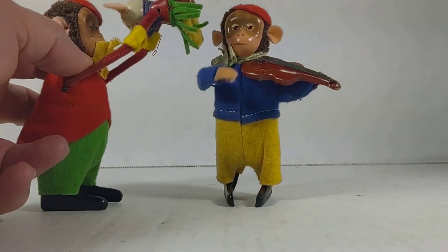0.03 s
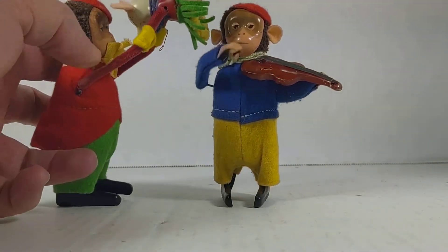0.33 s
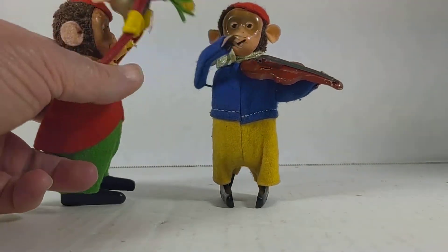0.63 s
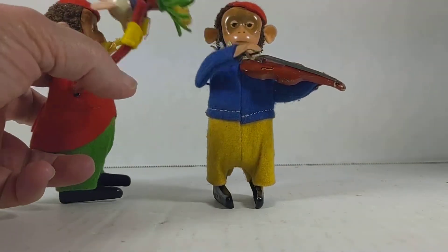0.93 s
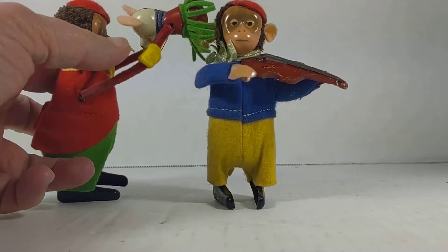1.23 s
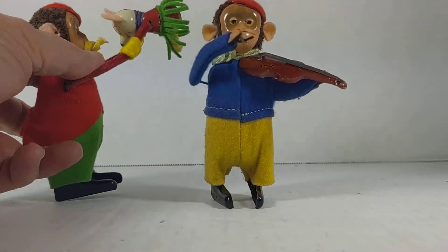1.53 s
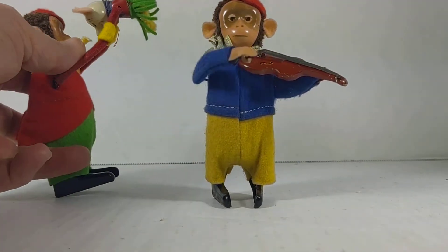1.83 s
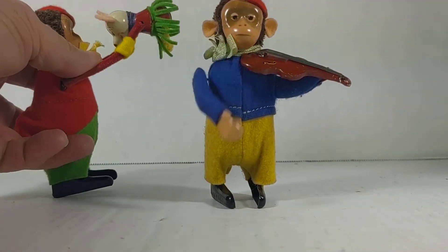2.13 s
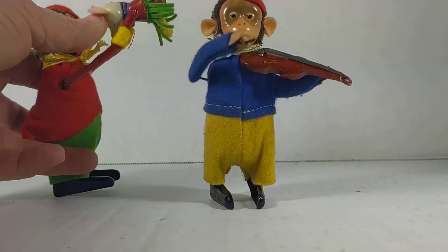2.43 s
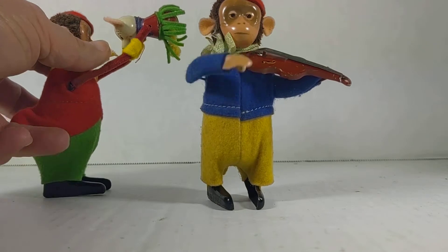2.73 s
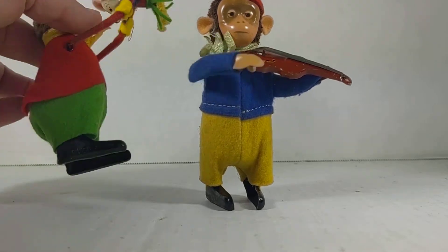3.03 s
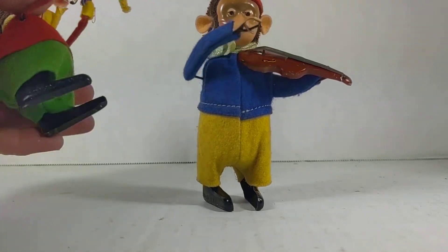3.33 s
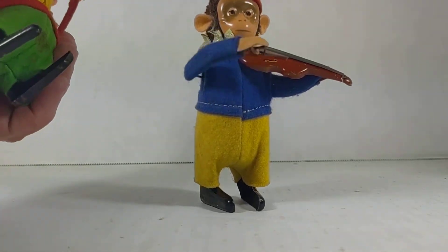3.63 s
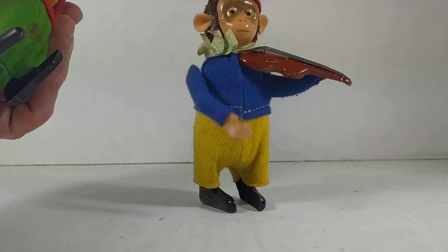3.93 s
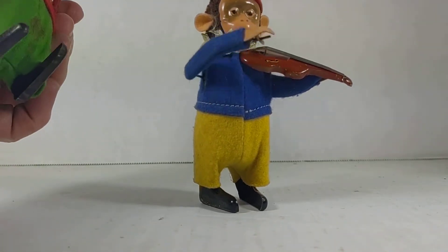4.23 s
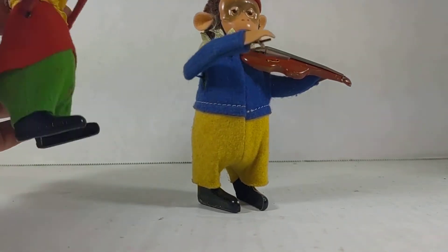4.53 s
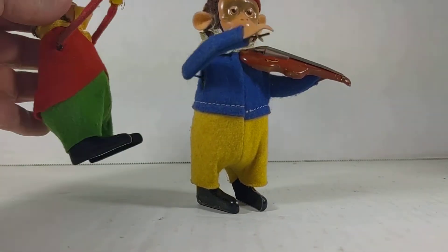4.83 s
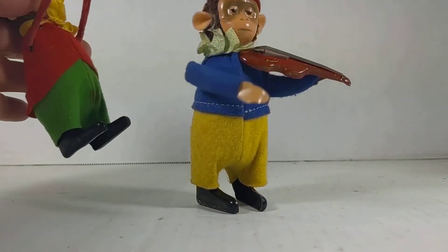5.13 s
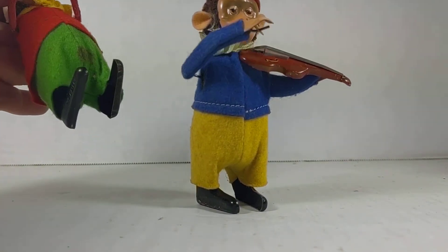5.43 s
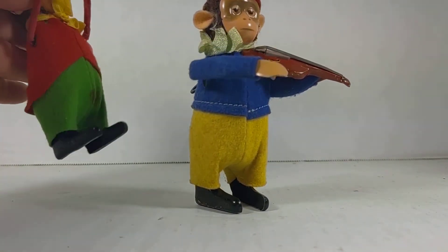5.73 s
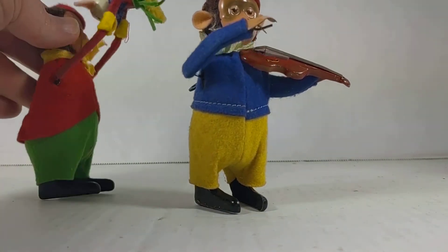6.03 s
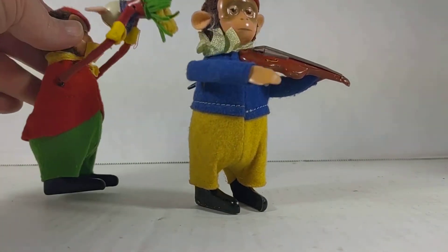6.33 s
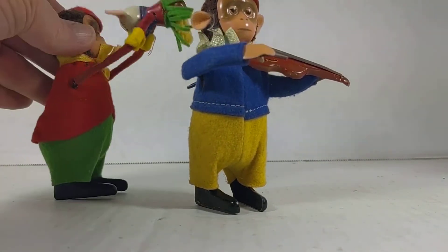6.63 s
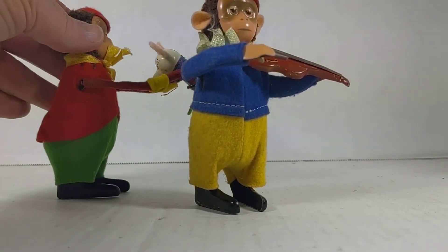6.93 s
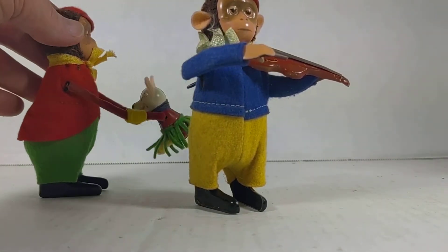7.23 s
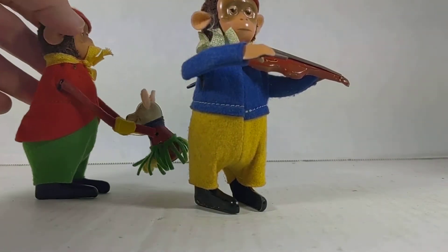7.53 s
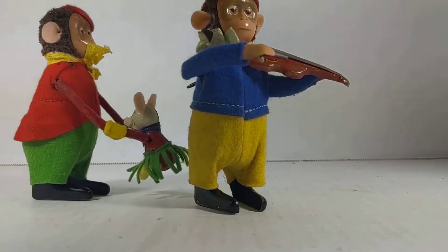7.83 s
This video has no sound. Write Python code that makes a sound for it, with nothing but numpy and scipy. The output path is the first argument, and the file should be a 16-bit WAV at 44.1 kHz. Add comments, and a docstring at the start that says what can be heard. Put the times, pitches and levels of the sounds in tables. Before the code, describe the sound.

From the start, a wind-up tin toy runs close by on a table, a bright, rapid ticking whirr with irregular sharp clacks from its arm, about four a second, and a faint low shuffle of its feet. From about 3 seconds the motor gradually slows and gets quieter, faltering around 4.2, 5.4 and 5.8 seconds. Fingers rub softly on felt, most noticeably near 4.7 seconds. Between 5.9 and 6.6 seconds a second toy is bumped on the table four times, dull thuds with a tinny jingle, the last the loudest. At 6.6 seconds a catch releases with a hard, bright snap, just as the first toy runs out. The second motor buzzes faster and smoother, pulsing at first and rumbling through the tabletop until the end, near 8 seconds. The room adds a slight short echo, with faint electrical hum underneath.

```python
"""On a table in a room, two clockwork tin toys play close by. A fiddler whirrs and clacks, turns slowly
on its feet and runs down. A hand bumps the second toy, a magician, on the table four times; its catch
snaps free and it buzzes off, faster and smoother. In each toy a small rocking lever (the pallet) hits
a toothed wheel many times a second, and these beats make the tin shell ring.
Both motors rumble through the table top; mains hum lies underneath."""
import sys
import numpy as np
from scipy import signal
from scipy.fft import rfft, irfft, next_fast_len
from scipy.io import wavfile
from scipy.ndimage import uniform_filter1d

SR = 44100
rng = np.random.default_rng(int(sys.argv[2]) if len(sys.argv) > 2 else 0)


def wav_out(sig):
    """Save sig, one row per channel (or a flat mono array), as 16-bit PCM at SR to the path in sys.argv[1]."""
    wavfile.write(sys.argv[1], SR, np.round(np.clip(np.atleast_2d(sig).T, -1, 1) * 32767).astype(np.int16))


N = 348390
TIME = np.arange(N) / SR

# the magician's feet hitting the table: t/s, thud level/dB, tin rattle level/dB
BUMPS = [(5.884, -18.5, -28), (6.076, -21, -32.5), (6.2786, -14, -25), (6.578, -9, -19.5)]
# tone of the table top under shuffling feet or a dull bump: f/Hz, level/dB
SHUFFLE_TONE = [(30, -35), (50, -13), (70, -4.5), (92, -1), (125, -5), (165, -6), (200, -9.5), (260, -29),
                (500, -26), (900, -36)]
# tone of the table top shaken by the magician, which stirs higher notes too: f/Hz, level/dB
RUMBLE_TONE = [(30, -34), (55, -24), (75, -10.5), (95, -2), (125, -10), (150, -7.5), (170, -5.5),
               (230, -19.5), (380, -33), (520, -32), (660, -24), (810, -40), (980, -28), (1140, -36.5),
               (1350, -26), (1540, -51), (1750, -38.5), (2000, -49)]


def fiddler():
    """A limping motor, quieter as it slows, and the bow arm rattle a tin shell; feet shake the table."""
    # the spring running down: t/s, speed/(beats per s)
    run_down = [(0, 150), (2.7, 152), (3.6, 141), (4.2, 124), (5.1, 117), (5.6, 108), (6.4, 93), (6.62, 80),
                (6.75, 20)]
    # the weak spring struggles with the bow stroke: t/s, share of speed lost/0-1
    hitches = [(4.222, .16), (4.41, .1), (5.42, .2), (5.8, .24), (6.478, .62)]
    # the six beats in one turn of the toothed wheel: level/dB
    wheel = [0.85, 6.3, 2.55, 5.5, 0.67, 5.3]
    # the pallet's notes: f/Hz, width/Hz, left/dB, right/dB, how far each follows the beat's level/0-1
    pallet_notes = [(3030, 274, -16.5, -16.5, 0.99), (7500, 500, -11, -8, 0.86), (9780, 670, -17.5, 0, 1),
                    (10400, 480, -22, -11, 1), (10790, 460, -21.5, -5.5, 0.94)]
    # the pallet slips and lands hard on a tooth: t/s, level/dB
    slips = [(0.2137, -19), (2.4044, -16), (2.93, -17), (3.988, -33), (4.213, -21), (4.262, -17),
             (4.308, -16), (4.395, -16), (4.833, -27), (4.884, -27), (5.0872, -26), (5.221, -14),
             (5.257, -21), (5.306, -28), (5.62, -18), (5.675, -21), (6.2625, -22)]
    # the shell's notes: f/Hz, width/Hz, facing front left/dB, right/dB, turned left/dB, right/dB
    tin_notes = [(1080, 190, -7, -9, -5.5, -7), (1312, 160, -2.5, 3, 1.5, -3),
                 (1494, 370, 0, -4, -48, -0.5), (1603, 390, -47, -48, -4, -1),
                 (2210, 175, -0.5, 3, -33, -26), (2635, 160, -17, -7.5, 8.5, 3),
                 (2910, 250, -21, -30, 9.5, 9.5), (3320, 74, -2, 1, -5, -21), (3504, 150, -1.5, 4, -4, -16),
                 (3830, 220, 0, -9, 1.5, 4.5), (4236, 280, -2, 8, -2, -6), (4676, 137, 2.5, 2.5, -21, 7.5),
                 (5026, 335, 1.5, 7, -1, -10), (5530, 232, -1, 2.5, 10, 1), (6125, 310, 0, -3.5, 6.5, 3.5),
                 (6550, 190, -1.5, -6, -1, 10), (6850, 500, 2.5, -2.5, 1.5, -18),
                 (7480, 620, -1.5, 9, 2, -4), (7950, 220, -10, 4, -28, 4), (8180, 520, 4, -4, -1, -1),
                 (8920, 200, -23, 3, -12, 7), (9490, 570, -23, 7.5, -9, 1.5), (10300, 1200, -7, 9.5, -8, 9),
                 (11260, 670, -6, 4.5, -18, -3), (12300, 300, -15, 5, -17, -11),
                 (12400, 230, -20, -2.5, -8, 4.5), (13100, 200, -20, -7, -16, 0),
                 (13330, 200, -20, -7, -13, -6), (14500, 1200, -17, -10.5, -17, -7),
                 (15800, 600, -14, -9, -20, -14)]
    # the toy turning on its feet: t/s, turn/0-1
    turning = [(0, 0), (1.5, 0.07), (2.0, 0.21), (3.0, 0.46), (3.6, 0.55), (5.6, 0.86)]
    # its feet shuffling on the table: t/s, level/dB
    footing = [(0, -51.5), (1.1, -51), (1.9, -54), (3.0, -54), (3.7, -62.5), (5.6, -65), (6.7, -62)]
    full_per_s, hitch_s, sway_per_s = 149.8, .045, 9.2
    full_db, half_speed_loss_db = -32, 16
    turn = in_time(turning)[0]
    speed_left = np.prod([1 - lost * np.exp(-((TIME - s) / hitch_s) ** 2) for s, lost in hitches], axis=0)
    per_s = in_time(run_down)[0] * speed_left
    rattle_db = full_db + half_speed_loss_db * doublings(per_s / full_per_s) + 2 * wander(sway_per_s)
    beats, db = wheel_beats(per_s, wheel, uneven_db=3, jitter_s=.0006)
    ticks = ticking(per_s, beats, db, bounce_db=-3.5, slack_db=3, tick_t60=.0073,
                    whirr_db=-9, whirr_t60=.041, alike=.25)
    pallet = pings(beats, db, rattle_db, pallet_notes, scatter_db=5, right_delay_s=.00004)
    clacks = bow_arm() + strike(*np.transpose(slips), t60=.0051, alike=.095)
    # the light wire arm hardly stirs the shell's lowest notes
    clacks = cut(clacks + 1e-12, "high", hz=2400, order=2)
    tin = shell(ticks * from_db(rattle_db) + clacks, tin_notes, turn, scatter_db=2.5)
    # the feet almost stop in each hitch
    shuffle_db = in_time(footing)[0] + 30 * doublings(speed_left) + 3.5 * wander(sway_per_s)
    return hollows(tin + pallet, turn) + from_db(shuffle_db) * coloured(SHUFFLE_TONE, alike=1)


def bow_arm():
    """The arm clacks on its stops, now bright, now dull, and sometimes scrapes; the motor grinds briefly after
    some hitches."""
    # the arm hitting its stops: t/s, level/dB, brightness/dB
    hits = [(0.0408, -20, 5), (0.244, -12, 2), (0.4802, -11.5, -1), (0.6449, -27, 0), (0.7570, -11, 6.5),
            (0.8892, -15, -5), (1.1675, -10, -9), (1.2984, -14, -4), (1.646, -11, -0.5),
            (1.943, -5.5, -1.5), (2.1595, -7.5, 2.5), (2.4902, -12.5, 4.5), (2.9771, -8, 2.5),
            (3.188, -15.5, 2.5), (3.491, -7.5, -5.5), (3.9419, -6.5, -0.5), (4.0377, -15, -4),
            (4.3422, -14.5, 0), (4.4468, -15, -0.5), (4.6127, -10.5, -2), (4.7127, -15.5, 0),
            (4.9415, -12.5, -5), (5.13, -13.5, -2), (5.5554, -12.5, 5), (6.2125, -14, -6),
            (6.3763, -20.5, -13)]
    # the arm dragging over the fiddle, and brief grinding as the motor races after a hitch: t/s, length/s,
    # level/dB
    scrapes = [(0.476, 0.027, -42), (2.683, 0.027, -25), (5.565, 0.079, -41), (6.215, 0.04, -33.5)]
    clacks = clatter([(s, db) for s, db, _ in hits], t60=.0064, loose_db=-9, before_s=.012, after_s=.014)
    body, edge = (cut(clacks + 1e-12, keep, hz=8500, order=3) for keep in ("low", "high"))
    bright_db = in_time(hits)[1]
    drag = sum(from_db(db) * ((TIME > s) & (TIME < s + length)) for s, length, db in scrapes)
    scrape = drag * from_db(2 * wander(250)) * white(alike=.061)
    return from_db(-1.5) * (body + from_db(bright_db) * edge) + scrape


def hollows(sound, turn, block_size=2048):
    """Direct and reflected sound cancel at a few pitches, which climb as the fiddler turns."""
    # the cancelled pitches: facing front f/Hz, turned f/Hz, width/Hz
    notches = [(2984, 3480, 280), (1960, 2540, 190), (5720, 6000, 200)]
    for front_hz, turned_hz, width in notches:
        state, blocks = np.zeros((2, 2)), []
        for i in range(0, N, block_size):
            hz = front_hz + (turned_hz - front_hz) * turn[i]
            notch = signal.iirnotch(hz, hz / width, fs=SR)
            block, state = signal.lfilter(*notch, sound[:, i:i + block_size], zi=state)
            blocks.append(block)
        sound = np.hstack(blocks)
    return sound


def magician():
    """Loose parts jingle at each bump; once freed, the motor buzzes and swells as the grip loosens."""
    # the four beats in one turn of the toothed wheel: level/dB
    wheel = [-2.5, -4.5, -7, -14.5]
    # pallet and plate notes: f/Hz, width/Hz, left/dB, right/dB, how far each follows the beat's level/0-1
    pallet_notes = [(2130, 180, -31, -27, .2), (2610, 330, -5, -3.5, 0.8), (5450, 340, -2, -5, 0.6),
                    (6550, 390, 9, -14, 1), (6810, 480, 11, 3.5, 1), (7800, 240, -1, 3.5, .8),
                    (12660, 330, -15, -4.5, 0.2), (13950, 840, -11, 3, 0.35)]
    # the shell's notes: f/Hz, width/Hz, arms up left/dB, right/dB, arms down left/dB, right/dB
    tin_notes = [(948, 70, -10, -5, -6, -1.5), (1358, 143, -9, -6, -1.5, 1),
                 (1740, 130, -4.5, -3.5, -4, -5), (3320, 430, -1, 2, -2, 4), (3714, 180, -2, 5, -7, 3.5),
                 (4280, 670, -1, -3, 5.5, 3.5), (4600, 600, -9, -2, 2.5, 6), (5000, 130, 4.5, 2, -9, 8.5),
                 (5470, 320, 1, 2, 1, 2), (6600, 690, 5.5, -5, 9, -3), (6980, 180, 2, 5, -3, 9),
                 (7530, 690, 1, 5, -4, 1), (8330, 390, -2, 1, 2, 6), (9030, 510, -5, 6.5, -4, 7.5),
                 (9600, 490, -12, 5.5, -12, 4), (10700, 450, -10, 6.5, -10, 8.5),
                 (11470, 370, -10, -1, -8, 4), (12300, 410, -10, 2, -9, 4), (13800, 790, -10, -4, -7, 3),
                 (14650, 450, -9, -2, -6, 1), (15500, 700, -11, -9, -8, -4)]
    # its arms coming down: t/s, drop/0-1
    arms = [(6.8, 0), (7.07, 0.45), (7.3, 1), (7.9, 0.96)]
    # its feet shaking the table as the hand lets go: t/s, level/dB
    footing = [(6.7, -44.5), (6.92, -52.5), (7.02, -38.5), (7.18, -47.5), (7.3, -44), (7.43, -57),
               (7.54, -40.5), (7.9, -41)]
    start_s, spin_up_s, loosen_s, full_per_s = 6.63, .08, .21, 203
    full_db, half_speed_loss_db = -31.5, 5
    surge_hz, crest_s, settle_s = 9.9, 6.76, .45
    age = np.maximum(TIME - start_s, 0)
    speed = (1 - np.exp(-age / spin_up_s)) * (1 + .029 * wander(8))
    per_s = full_per_s * speed
    # an off-centre gear makes the rattle surge, most of all at the start
    surge_db = 7 * np.exp(-age / settle_s) * np.cos(2 * np.pi * surge_hz * (TIME - crest_s))
    drive_db = full_db + half_speed_loss_db * doublings(speed)
    grip_db = 2 * np.exp(-age / loosen_s)
    beats, db = wheel_beats(per_s, wheel, uneven_db=2.5, jitter_s=.00025)
    db = db + np.interp(beats, TIME, surge_db)
    pallet = pings(beats, db, drive_db - .8 * grip_db, pallet_notes, scatter_db=2.5, right_delay_s=.00021)
    ticks = ticking(per_s, beats, .39 * db, bounce_db=-10, slack_db=8, tick_t60=.0087,
                    whirr_db=-7, whirr_t60=.06, alike=.07)
    jolts = [(s, tin_db) for s, _, tin_db in BUMPS]
    jingle = from_db(-.5) * clatter(jolts, t60=.028, loose_db=-5.5, before_s=.0015, after_s=.069, count=14)
    tin = shell(ticks * from_db(drive_db - grip_db) + jingle, tin_notes, in_time(arms)[0], scatter_db=2.5)
    # the feet tap the table on the strong beats
    tap_power = fade(impulses(beats, db) ** 2, t60=.047)
    taps = np.sqrt(tap_power / (uniform_filter1d(tap_power, size=4000) + 1e-6))
    rumble = speed * taps * from_db(in_time(footing)[0]) * coloured(RUMBLE_TONE, alike=.98)
    return tin + pallet + rumble


def wheel_beats(per_s, wheel_db, uneven_db, jitter_s):
    """Each passing tooth of the wheel gives one slightly uneven beat: returns times and levels."""
    beats = TIME[1:][np.diff(np.floor(np.cumsum(per_s) / SR)) > 0]
    strength, lateness = rng.standard_normal((2048, 2))[:len(beats)].T
    db = np.resize(wheel_db, len(beats)) + uneven_db * np.clip(strength, -2.5, 1.3)
    return beats + jitter_s * lateness, db


def ticking(per_s, beats, db, bounce_db, slack_db, tick_t60, whirr_db, whirr_t60, alike):
    """In both halves of the shell, the pallet hits and bounces; the gears whirr after each push."""
    bounce, gap = rng.standard_normal((2048, 2))[:len(beats)].T
    bounces = beats + .003 * np.exp(.41 * gap)
    # loose parts bounce more when the drive is weak
    weakness = 1 - np.interp(beats, TIME, per_s) / per_s.max()
    bounces_db = db + bounce_db + slack_db * weakness + 2 * np.clip(bounce, -2, 1)
    whirr = from_db(whirr_db) * np.sqrt(fade(impulses(beats, db) ** 2, whirr_t60))
    times, levels = np.r_[beats, bounces], np.r_[db, bounces_db]
    ticks = np.array([strike(times, levels, tick_t60, alike) + whirr * white(alike) for _ in range(2)])
    # the spring gives out its energy evenly, so hold the average power at 1
    power = uniform_filter1d(np.mean(ticks ** 2, axis=(0, 1)), size=5000)
    return ticks / np.sqrt(power + 1e-9)


def pings(beats, db, drive_db, notes, scatter_db, right_delay_s):
    """Each beat rings the steel pallet very briefly, every time with a new mix of its notes."""
    out = np.zeros((2, N))
    for hz, width, left_db, right_db, follows in notes:
        chance = np.clip(rng.standard_normal(2048)[:len(beats)], -2.5, 1.5)
        hits = impulses(beats, follows * db + np.interp(beats, TIME, drive_db) + scatter_db * chance)
        ping = cut(hits + 1e-12, "band", [hz - width / 2, hz + width / 2], order=2) * SR / (np.pi * width)
        out += [from_db(left_db) * ping, from_db(right_db) * np.roll(ping, round(right_delay_s * SR))]
    return out


def shell(hits, notes, pose, scatter_db):
    """Hits ring the broad notes of a tin body; what each side hears shifts with the toy's pose (0-1)."""
    out = np.zeros((2, N))
    for k, (hz, width, *sides_db) in enumerate(notes):
        low = np.hypot(hz, width / 2) - width / 2
        band = [low, min(low + width, .48 * SR)]
        gains = from_db(sides_db)[:, None]
        first, last = gains[:2], gains[2:]
        # no two hits land alike: each feeds this note by a new amount
        share = from_db(scatter_db * (wander(130) - scatter_db * np.log(10) / 20))
        out += cut(hits[k % 2] * share + 1e-12, "band", band, order=2) * (first + (last - first) * pose)
    return out


def clatter(hits, t60, loose_db, before_s, after_s, count=6):
    """Heavy double hits in both halves of the shell, among light touches of loose parts settling."""
    s, db = np.transpose(hits)
    touches = s[:, None] + rng.uniform(-before_s, after_s, (len(s), count))
    touch_db = db[:, None] + loose_db + rng.normal(0, 2.2, touches.shape)
    times = np.r_[s - .0005, s + .0005, touches.ravel()]
    levels = np.r_[db, db - 2, touch_db.ravel()]
    return np.array([strike(times, levels, t60, alike=.065) for _ in range(2)])


def strike(times, db, t60, alike, spots=4):
    """Hits land on a few spots in turn; each spot rings with its own dense cluster of short notes."""
    t = TIME[:2048]
    decay = from_db(-60 * t / t60)
    out = np.zeros((2, N))
    for k in range(spots):
        cluster = white(alike, len(t))
        # make the notes about equally strong
        for _ in range(2):
            spectrum = rfft(cluster * decay)
            cluster = irfft(spectrum / (np.abs(spectrum) + 1e-12)) / np.maximum(decay, .1)
        # the shaking takes a moment to spread through the tin
        cluster = cluster * decay * (1 - np.exp(-t / .00067))
        cluster *= np.sqrt(2 * np.sum(decay ** 2) / np.sum(cluster ** 2))
        out += signal.oaconvolve(impulses(times[k::spots], db[k::spots])[None], cluster, axes=1)[:, :N]
    return out


def catch():
    """One hard, bright snap of metal on metal that rebounds at once and leaves a faint ring."""
    # the catch coming free: t/s, level/dB
    snap = [(6.6207, -9.5)]
    # its tone: f/Hz, level/dB
    snap_tone = [(530, -50), (900, -46), (2140, 5), (3000, -15), (3510, -3), (8350, -11), (8980, 4.5),
                 (11100, 4), (12400, -16), (14000, -2), (16000, -6)]
    s, db = np.transpose(snap)
    hits = (impulses(s, db) + impulses(s + .001, db - 2)) ** 2
    power = fade(hits, t60=.014) + from_db(-29) ** 2 * fade(hits, t60=.1)
    return np.sqrt(power) * coloured(snap_tone, alike=.13) * from_db([[-2.5], [1.5]])


def table_bumps():
    """Each bump pushes the table top down and sets it ringing; the feet clank and the top shudders."""
    # the table top's notes: f/Hz, level/dB, time to fade by 60 dB/s
    top_notes = [(99, -3.5, 0.094), (123, -15.5, 0.15), (161, -21, 0.18), (234, -60, 0.17),
                 (330, -40.5, 0.093), (656, -32, 0.039), (990, -31, 0.029), (1330, -39, 0.068)]
    # tone of the clanking tin feet: f/Hz, level/dB
    feet_tone = [(400, 0), (1100, -5), (2100, -6.5), (3100, 10), (4500, -11), (9000, -25)]
    s, thud_db, tin_db = np.transpose(BUMPS)
    blows = impulses(s, thud_db)
    thud = sum(from_db(db) * ring(-blows, hz, t60) for hz, db, t60 in top_notes)
    shudder = from_db(-14) * np.sqrt(fade(blows ** 2, t60=.26)) * coloured(RUMBLE_TONE, alike=.82)
    clank_power = fade(impulses(s, tin_db) ** 2, t60=.11)
    clank = from_db(-5) * np.sqrt(clank_power) * coloured(feet_tone, alike=.17)
    # the top gives off little sound below its lowest note
    return cut(thud + shudder, "high", hz=58, order=4) + clank


def fingers():
    """At each shift of the grip, skin drags over the felt costume in small snags, over a dull bump."""
    # shifts of the grip: t/s, rub level/dB, bump level/dB, time to fade by 60 dB/s
    shifts = [(1.70, -48, -60, 0.27), (3.90, -52, -70, 0.37), (4.60, -47, -70, 0.54),
              (4.743, -40.5, -45.5, 0.57), (4.93, -56, -56, .45)]
    # tone of skin on felt: f/Hz, level/dB
    rub_tone = [(35, -43), (60, -27), (203, -13), (244, -0.5), (485, -10.5), (710, -7), (949, -15),
                (1590, -6.5), (2300, -16.5), (2990, -58), (5060, -120)]
    swell_s, snags_per_s = .021, 400
    rub, bump = 0, 0
    for s, rub_db, bump_db, t60 in shifts:
        swell = np.exp(np.minimum(TIME - s, 0) / swell_s) * from_db(-60 * np.maximum(TIME - s, 0) / t60)
        rub += from_db(rub_db) * swell
        bump += from_db(bump_db) * swell
    snags = fade((rng.random(N) < snags_per_s / SR) * rng.exponential(1, N), t60=.2)
    felt = rub * np.sqrt(snags / snags.mean()) * coloured(rub_tone, alike=.58)
    return felt + bump * coloured(SHUFFLE_TONE, alike=1)


def room(sound, echo_db, t60):
    """The walls add a faint, short spray of echoes, duller than the direct sound."""
    t = TIME[:SR // 2]
    echoes = rng.standard_normal((2, len(t))) * from_db(-60 * t / t60) * (t > .004)
    echoes /= np.sqrt(np.sum(echoes ** 2, axis=1, keepdims=True))
    echoes = cut(echoes, "low", hz=4500, order=1)
    return sound + from_db(echo_db) * signal.fftconvolve(sound, echoes, axes=1)[:, :N]


def background():
    """Steady mains hum and faint room air."""
    # the hum's notes: f/Hz, level/dB
    hum_notes = [(300, -63.5), (360, -65), (420, -63), (480, -75), (540, -75.5), (660, -82)]
    # tone of the air: f/Hz, level/dB
    air_tone = [(25, -15), (100, -24), (250, -7.5), (500, -16.5), (900, -17.5), (2000, -17.5), (6000, -18),
                (16000, -33)]
    side_cycles = np.array([[0], [.14]])
    hum = sum(np.sqrt(2) * from_db(db) * np.sin(2 * np.pi * (hz * TIME + rng.random() + side_cycles))
              for hz, db in hum_notes)
    return hum * from_db([[1.5], [.5]]) + from_db(-60) * coloured(air_tone, alike=.16)


def from_db(db):
    """Turn decibels into a number to multiply by."""
    return 10 ** (np.asarray(db) / 20)


def doublings(share):
    """How many times a speed has doubled (+) or halved (-) from full speed."""
    return np.log2(np.maximum(share, 1e-3))


def in_time(rows):
    """Join timed rows with straight lines: one curve for each column after the time."""
    s, *columns = np.transpose(rows)
    return [np.interp(TIME, s, column) for column in columns]


def wander(per_s):
    """A random value that glides to a new one so many times a second."""
    return np.interp(TIME * per_s, np.arange(2048), rng.standard_normal(2048))


def cut(sound, keep, hz, order):
    """Keep the "low" part, the "high" part or a "band"; a higher order cuts the rest more steeply."""
    return signal.sosfilt(signal.butter(order, hz, keep, fs=SR, output="sos"), sound)


def white(alike, size=N):
    """Stereo hiss; alike runs from 0 (unrelated sides) to 1 (the same on both)."""
    return np.sqrt(alike) * rng.standard_normal(size) + np.sqrt(1 - alike) * rng.standard_normal((2, size))


def coloured(tone, alike):
    """Stereo noise shaped to a tone (f/Hz, level/dB), with an average power of 1."""
    hz, db = np.transpose(tone)
    size = next_fast_len(N)
    bins = np.maximum(np.arange(size // 2 + 1) * SR / size, 1)
    gain = from_db(np.interp(np.log(bins), np.log(hz), db))
    gain *= np.minimum(bins / hz[0], 1) * np.minimum(hz[-1] / bins, 1) ** 2  # fall away past both ends
    noise = irfft(rfft(white(alike), size) * gain, size)[:, :N]
    return noise / np.sqrt(np.mean(noise ** 2) + 1e-20)


def impulses(times, db):
    """A one-sample click of the given level at each time."""
    out = np.zeros(N)
    np.add.at(out, np.clip(np.asarray(times) * SR, 0, N - 1).astype(int), from_db(db))
    return out


def fade(power, t60):
    """Each burst of power dies away, by 60 dB in t60 seconds."""
    return signal.lfilter([1], [1, -from_db(-120 / (t60 * SR))], power + 1e-18)


def ring(clicks, hz, t60):
    """Each click starts a pure note that dies away."""
    decay, step = from_db(-60 / (t60 * SR)), 2 * np.pi * hz / SR
    return signal.lfilter([0, np.sin(step)], [1, -2 * decay * np.cos(step), decay ** 2], clicks + 1e-18)


def scene():
    """Both toys in the room, the table, the hand and the background."""
    toys = fiddler() + magician() + catch()
    return room(toys, echo_db=-11, t60=.41) + table_bumps() + fingers() + background()


def record(dry):
    """The very highest treble is cut off steeply."""
    cutoff_hz = 15700
    return signal.sosfilt(signal.ellip(12, .1, 80, cutoff_hz, fs=SR, output="sos"), dry)


dry = scene()
out = record(dry)
wav_out(out)
```